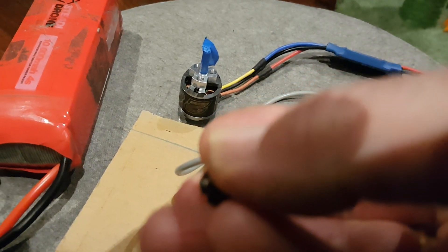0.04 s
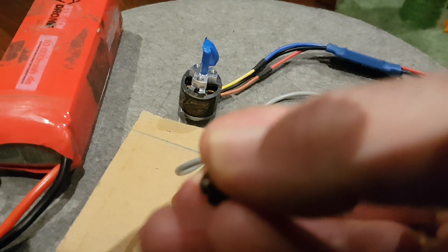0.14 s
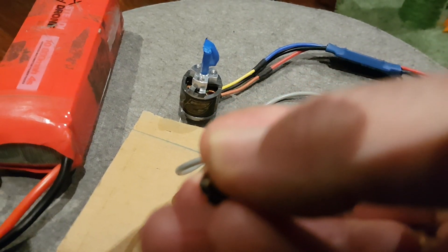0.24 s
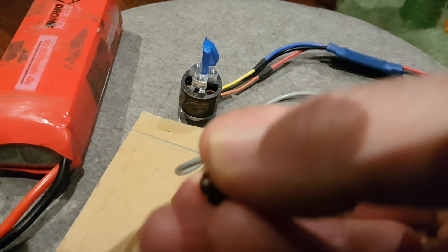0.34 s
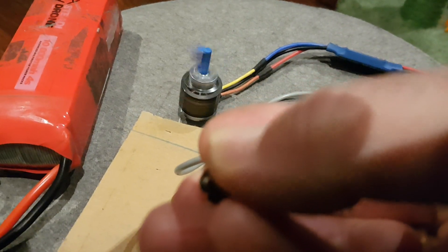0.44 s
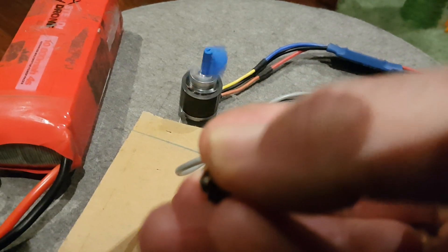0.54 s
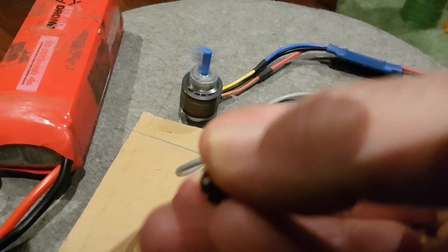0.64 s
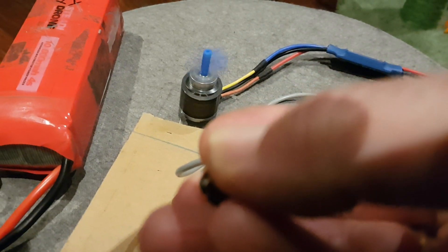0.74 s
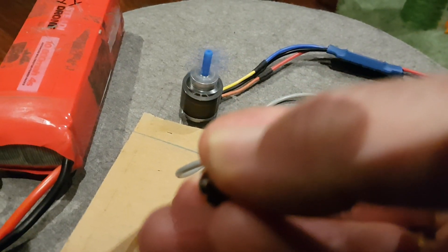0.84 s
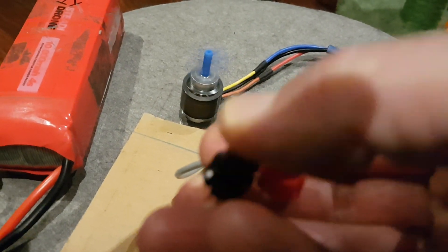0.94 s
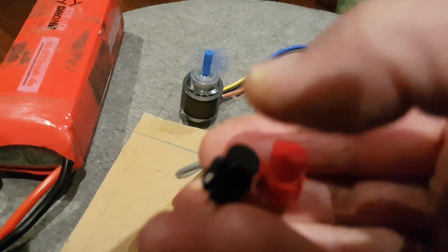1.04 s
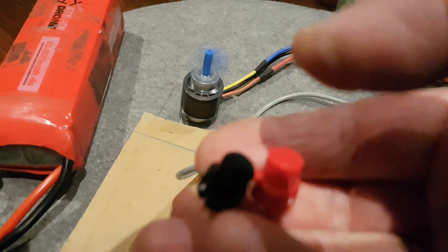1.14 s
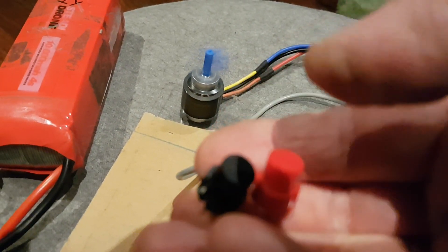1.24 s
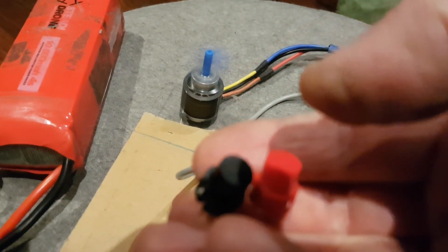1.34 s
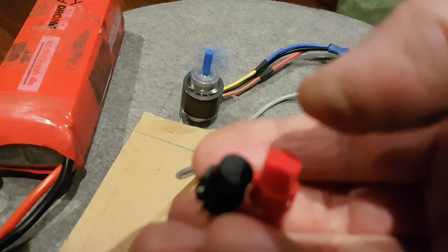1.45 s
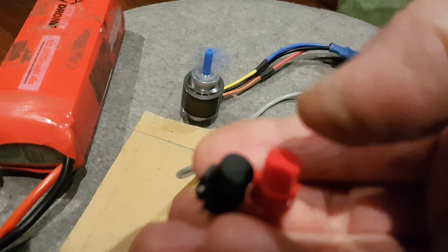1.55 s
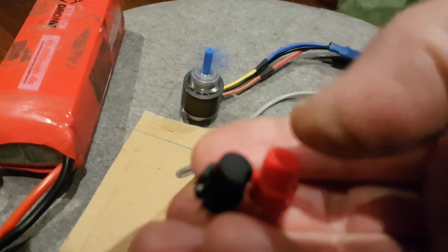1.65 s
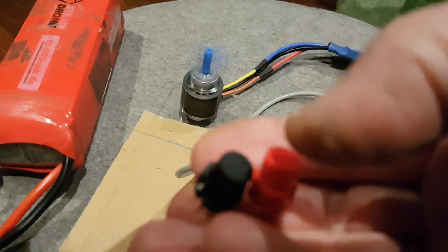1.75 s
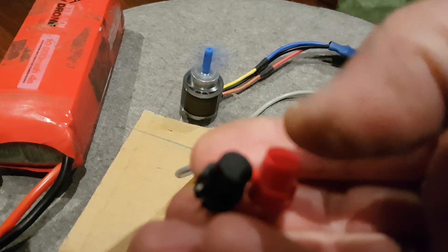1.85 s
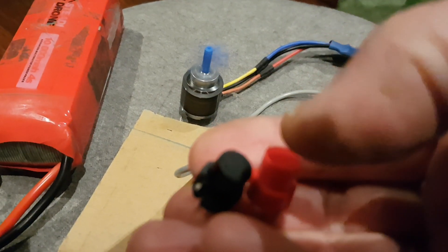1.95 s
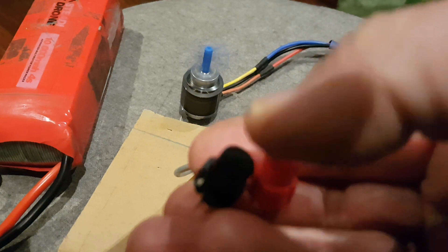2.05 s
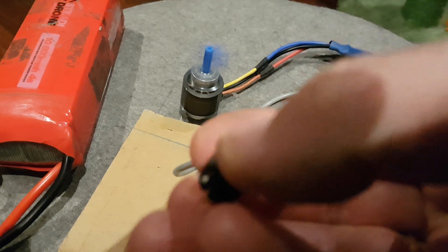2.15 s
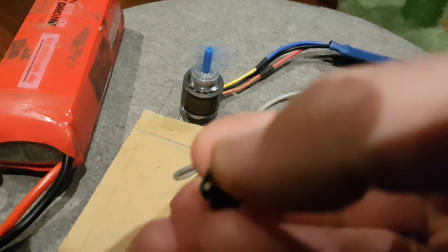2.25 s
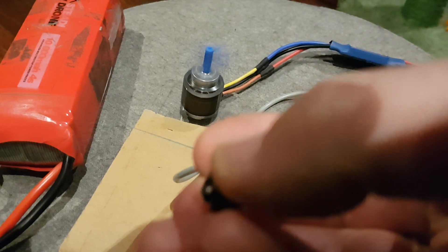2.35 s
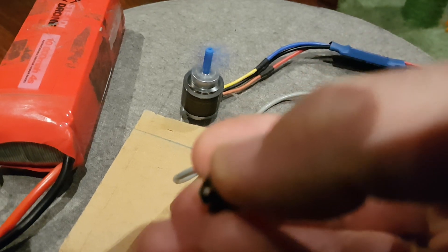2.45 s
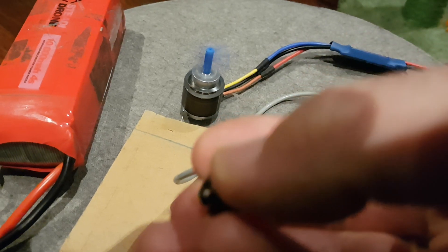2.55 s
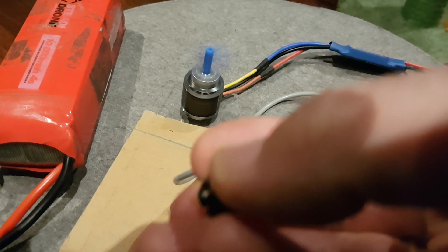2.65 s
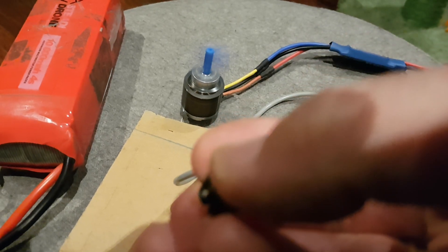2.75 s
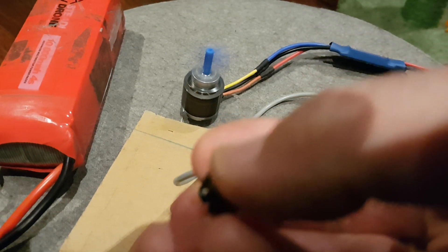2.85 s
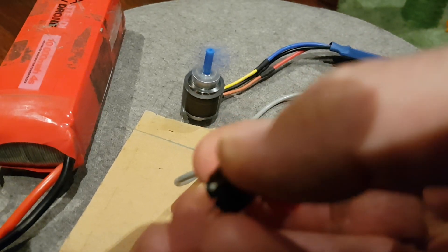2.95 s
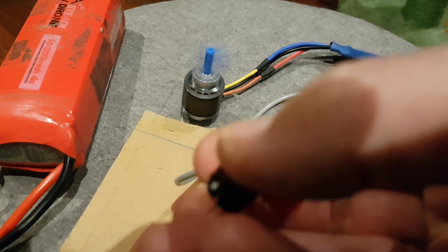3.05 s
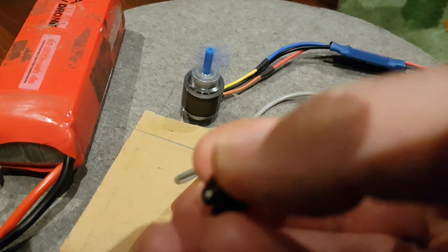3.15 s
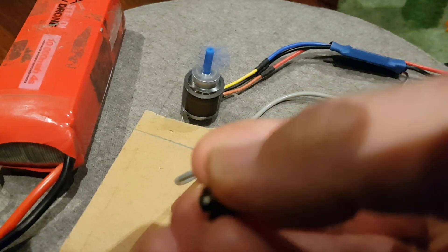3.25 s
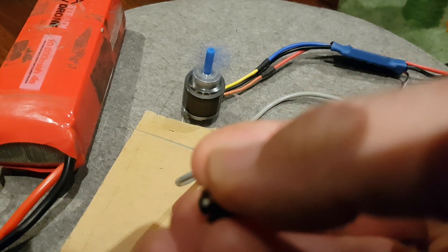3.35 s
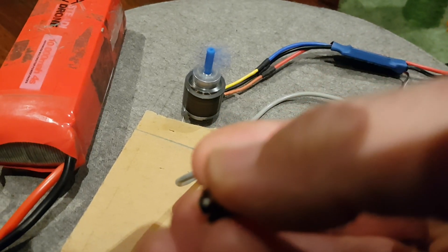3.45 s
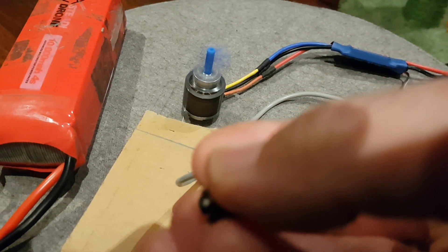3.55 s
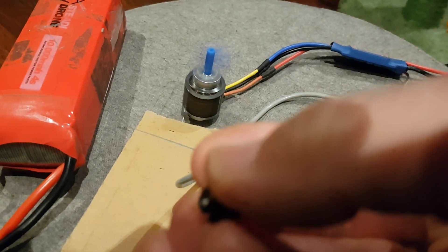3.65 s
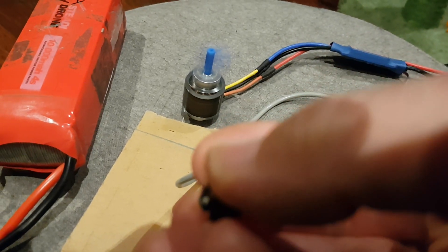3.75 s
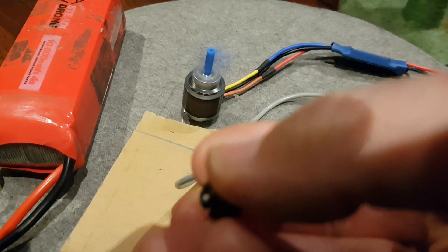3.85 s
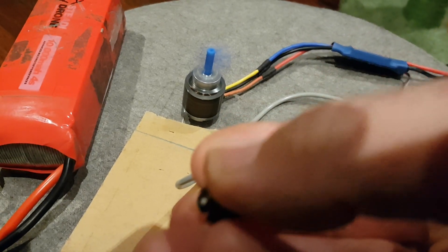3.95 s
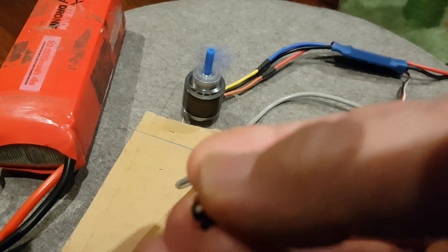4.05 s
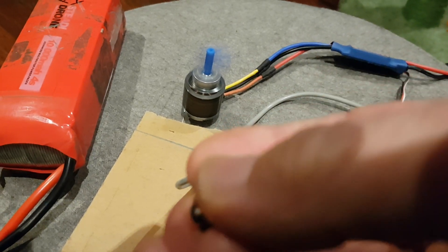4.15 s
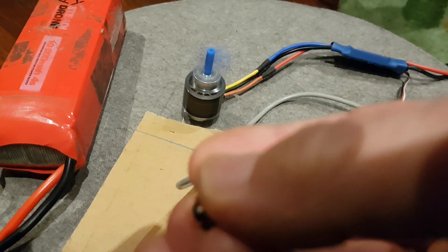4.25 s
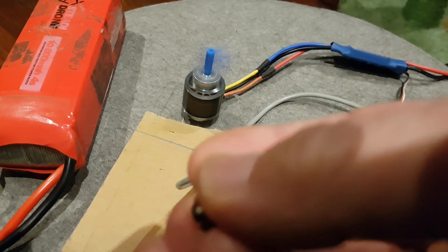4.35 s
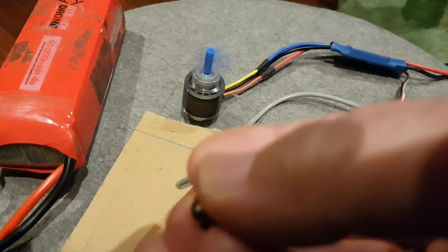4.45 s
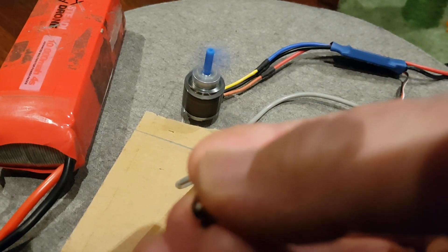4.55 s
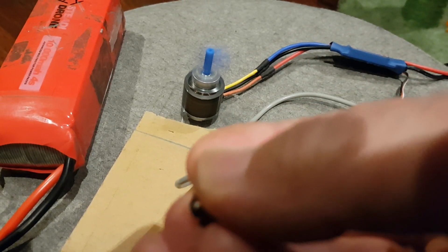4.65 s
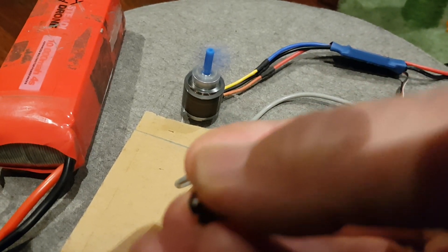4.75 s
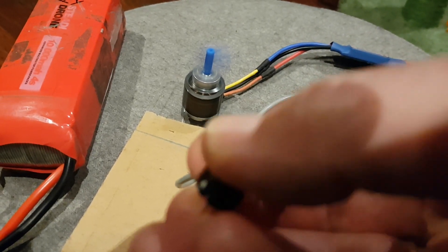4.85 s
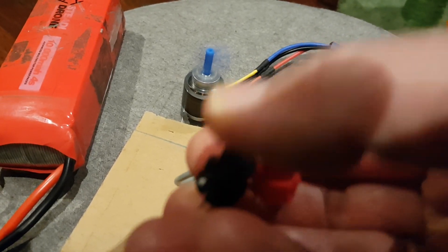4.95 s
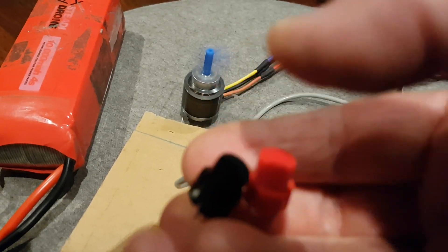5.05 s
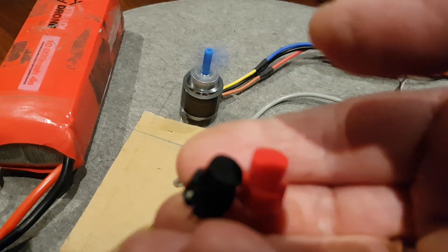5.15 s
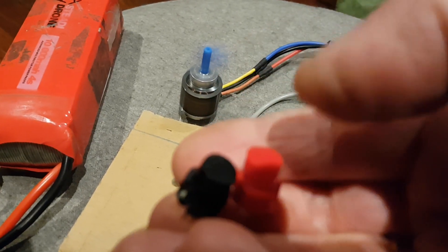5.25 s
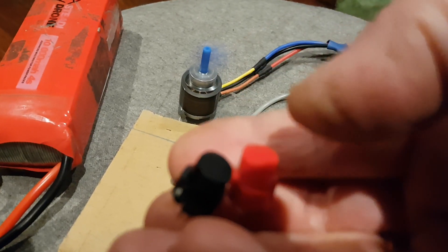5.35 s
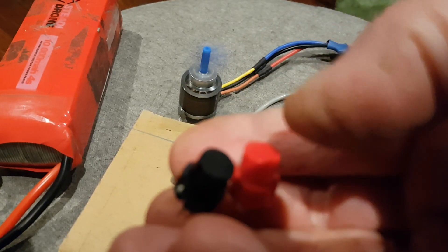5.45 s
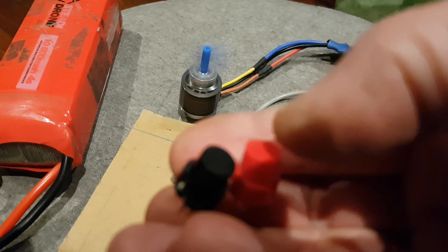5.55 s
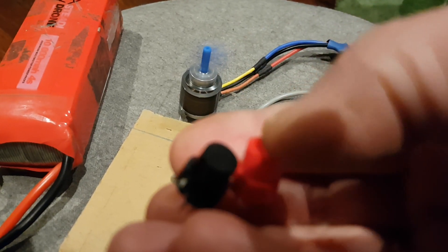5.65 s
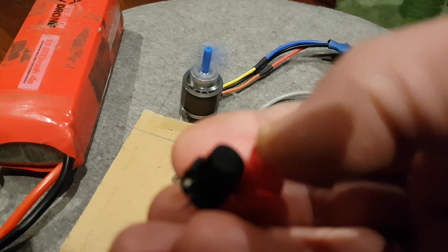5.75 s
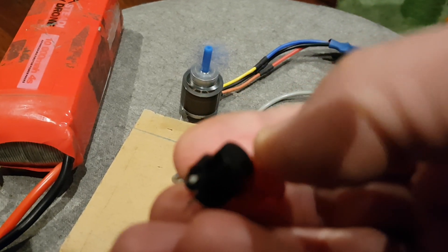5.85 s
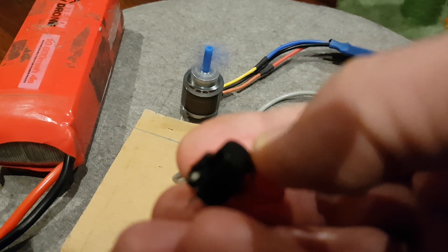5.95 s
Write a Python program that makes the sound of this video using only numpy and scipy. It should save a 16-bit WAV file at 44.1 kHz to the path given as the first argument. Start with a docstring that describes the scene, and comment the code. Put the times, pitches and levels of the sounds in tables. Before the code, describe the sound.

A small brushless motor ticks, stutters, then spins up to a steady whine that steps higher and louder as its speed is raised.

```python
"""A quiet room, then a tick and a stutter: a small brushless motor on a bench switches on, catches,
and is stepped up three times to full throttle, close to a phone's two microphones, a little to one side.
A tape flag on the shaft hums once a turn, magnets and slots whine through the body's resonances,
the bearings hiss and rattle, and the controller's chopping sings high above until full throttle ends it.
Two soft handling bumps sound underneath."""
import sys
import numpy as np
from scipy import signal
from scipy.fft import rfft, irfft, next_fast_len
from scipy.io import wavfile

SR = 44100
rng = np.random.default_rng(int(sys.argv[2]) if len(sys.argv) > 2 else 0)


def wav_record(signal):
    """Record a signal, one row per channel, as 16-bit PCM in the file named by sys.argv[1]."""
    frames = np.transpose(np.atleast_2d(signal))
    bounded = np.clip(frames, -1, 1)
    # unit amplitude maps onto the largest positive 16-bit level
    quanta = np.round(bounded * 32767).astype(np.int16)
    wavfile.write(sys.argv[1], SR, quanta)


N = 264803
TIME = np.arange(N) / SR
STEP = 64  # samples per control tick
TICKS = TIME[::STEP]
ON_S, DRIVE_S, CATCH_S = .414, .716, .754  # the controller switches on, begins to drive, the rotor catches
BUILD_S, LOCK_S, SURGE_S = .081, .042, .23  # the stutter builds, the rotor locks, the starting surge fades


def undb(db):
    """Decibels to gain."""
    return 10 ** (np.asarray(db) / 20)


def to_db(gain):
    """Gain to decibels, with silence far down."""
    return 20 * np.log10(gain + 1e-5)


def ramp(at, start_s, length_s):
    """A smooth rise from 0 to 1."""
    return (1 - np.cos(np.pi * np.clip((at - start_s) / length_s, 0, 1))) / 2


def peaks_db(hz, resonances):
    """Lift or dip that (centre_hz, width_hz, gain_db) resonances give at a frequency."""
    return sum(db / (1 + (2 * (hz - centre) / width) ** 2) for centre, width, db in resonances)


def colour(x, points, lead=((1, 0),)):
    """Filter by (freq_hz, gain_db) points and turn the phase by (freq_hz, lead_rad) points."""
    size = next_fast_len(N + SR // 10)
    log_hz = np.log(np.maximum(np.fft.rfftfreq(size, 1 / SR), 1))
    db, angle = (np.interp(log_hz, np.log(p[:, 0]), p[:, 1]) for p in map(np.array, (points, lead)))
    return irfft(rfft(x, size) * undb(db) * np.exp(1j * angle), size)[..., :N]


def noise(points):
    """Noise shaped by (freq_hz, density_db_per_hz) points."""
    return colour(rng.standard_normal(N) * np.sqrt(SR / 2), points)


def walk(rate_hz):
    """A smooth random wander at the control ticks, spread 1."""
    pole = np.exp(-2 * np.pi * rate_hz * STEP / SR)
    wander = signal.lfilter([1], [1, -2 * pole, pole ** 2], rng.standard_normal(len(TICKS)))
    return wander / wander.std()


def tone(cycles, db, waver_db, blur):
    """A sine of rms level db (given at the ticks); its strength wavers, its phase drifts by blur cycles."""
    gain = np.interp(TIME, TICKS, undb(db + waver_db * walk(16.2)))
    drift = np.interp(TIME, TICKS, blur * walk(19.0) + rng.random())
    return np.sqrt(2) * gain * np.sin(2 * np.pi * (cycles + drift))


def order_comb(turns, orders, scatter_db=3, size=4096):
    """Fine irregularities that come round on every turn: a complex comb of shaft-speed multiples."""
    strengths = undb(scatter_db * rng.standard_normal(len(orders)))
    lines = np.zeros(size, complex)
    lines[orders] = strengths * np.exp(2j * np.pi * rng.random(len(orders)))
    return np.sqrt(2) * np.interp(turns % 1 * size, np.arange(size), np.fft.ifft(lines) * size)


def effort(at, stutter_db, running_db, surge_db, start_s=ON_S, rise_s=BUILD_S):
    """Gain in dB of a part: silent, stuttering, then running, with a surge as the rotor gathers speed."""
    caught = ramp(at, CATCH_S, LOCK_S)
    surge = np.exp(-np.maximum(at - CATCH_S - LOCK_S, 0) / SURGE_S)
    onset_db = to_db(ramp(at, start_s, rise_s))
    return onset_db + (1 - caught) * stutter_db + caught * (running_db + surge_db * surge)


# Room tone around the bench: freq_hz, density_db_per_hz
ROOM_TONE = [(30, -106), (80, -89), (300, -88), (600, -87.5), (1000, -95.5), (2000, -104), (4000, -116),
             (8000, -117), (15000, -116)]

def room_tone(trim_db=-4):
    """The room murmurs, partly alike in both microphones and partly different in each."""
    return undb(trim_db) * (noise(ROOM_TONE) + np.array([noise(ROOM_TONE), noise(ROOM_TONE)]))


def walls(x, t60_s=.14, wet_db=-17):
    """The near walls of a small room return a short, dull tail, different at each microphone."""
    t = TIME[:SR // 2]
    tail = rng.standard_normal((2, len(t))) * undb(-60 * t / t60_s) * (t > .004)
    dull_tail = signal.lfilter([.4], [1, -.6], tail / np.linalg.norm(tail[0]))
    return undb(wet_db) * signal.fftconvolve(x[None], dull_tail, axes=1)[:, :N]


# Handling noise at the phone: start_s, level_db, pitch_hz
HANDLING_BUMPS = [(0.536, -43, 120), (3.392, -34, 95)]

def handling(decay_s=.0034):
    """The hand gives dull, nearly dead thumps."""
    out = np.zeros(N)
    for start_s, db, hz in HANDLING_BUMPS:
        t = np.maximum(TIME - start_s, 0)
        out += undb(db) * t / decay_s * np.exp(1 - t / decay_s) * np.sin(2 * np.pi * hz * t)
    return out


# Moves of the throttle, the last one to full: start_s, length_s, shaft_hz
THROTTLE_MOVES = [(1.315, .17, 155.8), (1.625, .14, 154.2), (2.385, .5, 179.1), (3.35, .32, 187.4),
                  (4.065, .55, 197.2), (4.46, .175, 206.15)]

def throttle(at, idle_hz=151.7):
    """The shaft speed that the throttle asks for: each move eases over to the next setting."""
    setting, hz = np.full(len(at), idle_hz), idle_hz
    for start_s, length_s, new_hz in THROTTLE_MOVES:
        setting += (new_hz - hz) * ramp(at, start_s, length_s)
        hz = new_hz
    return setting


def shaft_speed(at, stutter_hz=28, spin_up_s=.132, s_curve=1.32):
    """Turns per second: a slow stutter, an S-shaped run-up once caught, then as the throttle asks."""
    lag = np.exp(-(np.maximum(at - CATCH_S, 0) / spin_up_s) ** s_curve)
    return stutter_hz * lag + throttle(at) * (1 - lag)


def shaft_turns(hunt_turns=.018, hunt_s=.13):
    """Turns made so far; the rotor hunts roughly back and forth until it has locked in."""
    hunting = hunt_turns * walk(45) * np.exp(-np.maximum(TICKS - CATCH_S, 0) / hunt_s)
    return np.cumsum(shaft_speed(TIME)) / SR + np.interp(TIME, TICKS, hunting)


def switch_on_tick(decay_s=.017):
    """The first jolt of current ticks in the windings."""
    envelope = (TIME > ON_S) * np.exp(-np.maximum(TIME - ON_S, 0) / decay_s)
    spectrum = [(600, -100), (1500, -86), (2300, -80.5), (3000, -100), (5000, -101), (8000, -108)]
    return envelope * noise(spectrum)


# Bearing and air noise, close to the motor: freq_hz, density_db_per_hz
BEARING_HISS = [(30, -119), (100, -78.5), (270, -80.5), (450, -78), (780, -83.5), (1050, -75.5),
                (1300, -84.5), (2050, -81.5), (2700, -91.5), (3500, -93), (5000, -84.5), (7000, -96),
                (10000, -102), (15000, -100)]

def hiss(turns):
    """The races and the whirled air hiss; once the rotor runs, a little harder once a turn."""
    throb = 1 + .33 * ramp(TIME, CATCH_S, LOCK_S) * np.cos(2 * np.pi * turns)
    flutter_db = .6 * walk(25)
    db = effort(TICKS, stutter_db=-19.5, running_db=0, surge_db=-6.5) + flutter_db
    return noise(BEARING_HISS) * throb * np.interp(TIME, TICKS, undb(db))


# Rings of the motor standing loose on the bench: pitch_hz, width_hz, relative_db
MOUNT_MODES = [(634, 34, 7.5), (947, 94, 9), (1473, 48, -3), (1904, 61, -9), (2320, 44, -8)]
# Jerks of the rotor before it catches: start_s, peak_db
ROTOR_JERKS = [(.446, -39), (.478, -37), (.518, -34.5), (.539, -40), (.559, -34), (.596, -33.5),
               (.715, -31.5)]

def rattle(taps_per_s=900, scatter_db=-1.0):
    """Jerks of the starting rotor and a stream of tiny taps ring the motor; each ring swells briefly."""
    t = TIME[:SR // 10]
    ring = sum(undb(db) * width ** 2 * t * np.exp(-2 * np.pi * width * t) * np.sin(2 * np.pi * hz * t)
               for hz, width, db in MOUNT_MODES)
    taps = (rng.random(N) < taps_per_s / SR) * np.sign(rng.standard_normal(N))
    taps *= undb(scatter_db * rng.standard_normal(N))
    taps_db = effort(TIME, stutter_db=-46, running_db=-54, surge_db=10, rise_s=.1)
    force = taps / taps.std() / np.linalg.norm(ring) * undb(taps_db)
    for start_s, db in ROTOR_JERKS:
        force[int(start_s * SR)] += undb(db) / np.abs(ring).max()
    return signal.fftconvolve(force, ring)[:N]


# Ball-pass tones of the bearings: shaft_multiple, full_speed_level_db
BALL_TONES = [(2.648, -54), (3.185, -60), (4.178, -50), (5.178, -56), (9.555, -58)]

def bearings(turns, speed):
    """At high speed the balls sing between the whole multiples of the shaft speed."""
    speed_db = 45 * np.log10(speed / speed.max()) + to_db(ramp(TICKS, ON_S, BUILD_S))
    return sum(tone(k * turns, db + speed_db, waver_db=.5, blur=.057) for k, db in BALL_TONES)


# Resonances (+) and anti-resonances (-) of motor and bench: centre_hz, width_hz, gain_db
BODY_MODES = [(380.6, 89, -15), (524, 40, -14.5), (549, 103, 8), (669, 56, -27), (780, 49, 7.5),
              (958, 195, 11.5), (1292, 56, -14.5), (1455, 87, 6.5), (2103, 367, 18), (2116, 79, -15.5),
              (2630, 160, -29), (2940, 720, -5), (3480, 240, -4.5), (5300, 1100, 4), (6560, 760, -3.5),
              (7510, 240, 6.5), (8850, 8950, -10), (9810, 1700, 10), (13475, 150, -8)]
# Sharp rings of the rotor bell: centre_hz, width_hz, gain_db
BELL_MODES = [(4085, 80, 9), (4400, 70, 4)]

def body_db(hz, low_cut_hz=310):
    """How strongly motor and bench radiate at a frequency; so small a body gives off little bass."""
    return peaks_db(hz, BODY_MODES + BELL_MODES) - 20 * np.log10(1 + (low_cut_hz / hz) ** 4)


# Commutation tones above the chop rate: offset_shaft_multiple, base_level_db
CHOP_SIDEBANDS = [(8, -59.5), (9, -59.5), (10, -80), (11, -61.5), (12, -58), (13, -85), (14, -100),
                  (24, -56), (25, -65), (26, -78), (28, -59), (30, -85)]
# Fizz of the switched windings, close up: freq_hz, base_density_db_per_hz
WINDING_FIZZ = [(9000, -118), (10200, -90.5), (12000, -106), (13600, -101), (15000, -105), (15400, -100),
                (15800, -100)]

def controller(turns, chop_hz=7822, slip_per_turn=.757, switch_s=.008, side_db_per_hz=.14, slots=12):
    """Chopped current makes the windings sing until full throttle; sidebands climb with the speed."""
    speed = shaft_speed(TICKS)
    full_s, length_s, full_hz = THROTTLE_MOVES[-1]
    fade_db = to_db(1 - ramp(TICKS, full_s - .06, length_s))  # begins just ahead of the last move

    def switched_db(**stages):
        return fade_db + effort(TICKS, rise_s=switch_s, **stages)

    chop_db = switched_db(stutter_db=-2, running_db=.5, surge_db=5.5, start_s=DRIVE_S)
    octave_db = switched_db(stutter_db=-3, running_db=-5, surge_db=6)
    fizz_db = switched_db(stutter_db=-4, running_db=-7, surge_db=17)
    side_db = switched_db(stutter_db=-22, running_db=3.5, surge_db=9, start_s=DRIVE_S)
    side_db += side_db_per_hz * (throttle(TICKS) - full_hz)
    chop = chop_hz * TIME - slip_per_turn * turns  # each commutation delays the chopping slightly
    tones = tone(chop, chop_db - 59, waver_db=.45, blur=.01)
    tones += tone(2 * chop, octave_db - 62, waver_db=1.5, blur=.05)
    for k, db in CHOP_SIDEBANDS:
        tones += tone(chop + k * turns, db + side_db + body_db(chop_hz + k * speed), waver_db=1.6, blur=.12)
    tones += tone(2 * chop - slots * turns, side_db - 68, waver_db=1.5, blur=.05)
    weak_sidebands = (order_comb(turns, np.arange(13, 46)) * np.exp(2j * np.pi * chop)).real
    weak_sidebands *= np.interp(TIME, TICKS, undb(side_db - 74))
    fizz = noise(WINDING_FIZZ) * np.interp(TIME, TICKS, undb(fizz_db))
    return tones + weak_sidebands + fizz


# Orders of the magnetic and mechanical forces: shaft_multiple, base_level_db
FORCE_ORDERS = [(2, -43), (3, -48), (4, -50), (6, -53), (7, -56), (8, -57), (9, -51), (11, -57), (12, -55),
                (13, -62), (14, -65), (15, -64), (16, -66), (17, -65), (18, -64), (19, -63), (20, -64),
                (21, -60), (22, -65), (23, -62), (25, -61), (26, -61), (27, -60), (28, -61), (30, -66),
                (31, -66), (32, -67), (33, -66), (34, -67), (35, -66), (36, -55), (37, -61), (42, -70),
                (43, -66), (48, -73), (53, -68), (54, -70), (60, -63), (62, -66), (63, -69), (64, -68),
                (66, -68), (70, -71), (72, -62)]

def whine(turns, speed):
    """Magnets and slots whine; orders swell and fade as the speed carries them through body resonances."""
    effort_db = effort(TICKS, stutter_db=-11, running_db=2.13, surge_db=-2.5)
    buzz = sum(tone(k * turns, db + effort_db + body_db(k * speed), waver_db=1.27, blur=.0024)
               for k, db in FORCE_ORDERS)
    fine_gain = np.interp(TIME, TICKS, undb(effort_db - 79) * speed / speed.max())
    return buzz + fine_gain * order_comb(turns, np.arange(38, 102)).real


# Resonances that single orders excite strongly: shaft_multiple -> centre_hz, width_hz, base_peak_db
SINGING_MODES = {2: [(313, 16.4, -47)], 5: [(792, 29, -55), (951, 65, -40.5)], 10: [(1020, 170, -43),
                 (1490, 170, -42), (2032, 130, -42.5)], 24: [(4517, 61, -38)], 25: [(4124, 92, -44.5)],
                 29: [(2230, 270, -43.5), (3220, 120, -54), (4497, 46, -44)], 36: [(2280, 190, -40.5),
                 (4370, 100, -49), (5560, 290, -57)], 60: [(10700, 1200, -58.5)], 72: [(13500, 200, -60)]}

def singing(turns, speed):
    """An order sings out when the speed carries it onto one of its resonances, and dips between two."""
    drive_db = effort(TICKS, stutter_db=-15, running_db=-.5, surge_db=1)
    out = np.zeros(N)
    for k, modes in SINGING_MODES.items():
        response = sum(undb(db) / (1 + 2j * (k * speed - hz) / width) for hz, width, db in modes)
        out += tone(k * turns, drive_db + to_db(np.abs(response)), waver_db=1.06, blur=.022)
    return out


# Low resonances (+) and an anti-resonance (-) of the bench under the motor: centre_hz, width_hz, gain_db
BENCH_MODES = [(80, 40, 11), (139, 18, 5.5), (172.5, 13, 7.3), (180.5, 7, -3.6)]

def flag_hum(turns, speed, base_db=-25, db_per_decade=96):
    """Flag and unbalance push the air once a turn, much harder with speed and on the bench's resonances."""
    db = base_db + db_per_decade * np.log10(speed / speed.max()) + peaks_db(speed, BENCH_MODES)
    return tone(turns, db, waver_db=.85, blur=.0019)


# The left microphone lies in the phone's shadow: freq_hz, left_minus_right_db
LEFT_SHADOW = [(180, -4.5), (400, -7.5), (1000, -2.5), (1700, -1), (2300, -3.5), (3200, -6), (4500, -22.5),
               (8000, -29), (11000, -17), (15000, -15.5)]
# The two microphones hear the motor out of step: freq_hz, left_lead_rad
LEFT_LEAD = [(180, 0.33), (600, 0.21), (1640, 0.87), (2500, -1.56), (3200, 1)]

def scene():
    """The motor stands close by, nearer the right microphone; the left gets more scattered hiss."""
    turns, speed = shaft_turns(), shaft_speed(TICKS)
    motor = whine(turns, speed) + singing(turns, speed) + bearings(turns, speed) + hiss(turns)
    motor += rattle() + switch_on_tick() + controller(turns)
    left, right = motor + walls(motor) + flag_hum(turns, speed) + handling()
    scattered = colour(hiss(turns), [(40, -15), (100, 3), (400, 3.5), (2000, -16), (5000, 14), (9000, 4)])
    left = colour(left + scattered, LEFT_SHADOW, LEFT_LEAD)
    return np.array([left, right]) + room_tone()


def record(dry):
    """The phone cuts the top treble steeply."""
    top_hz = 15750
    return signal.sosfilt(signal.ellip(10, .2, 70, top_hz, fs=SR, output="sos"), dry)


dry = scene()
out = record(dry)
wav_record(out)
```